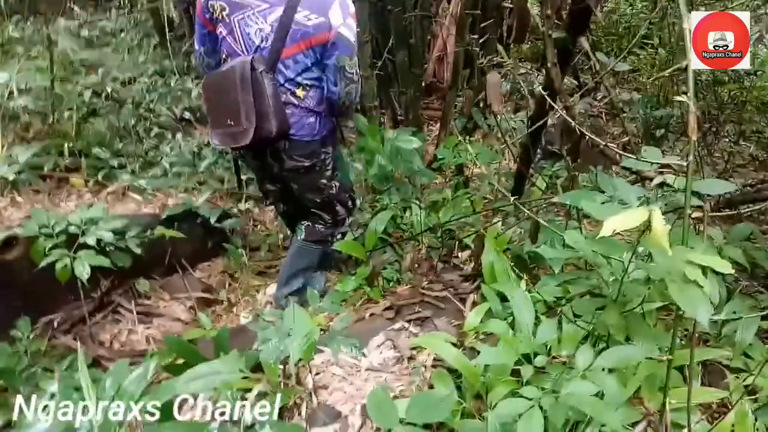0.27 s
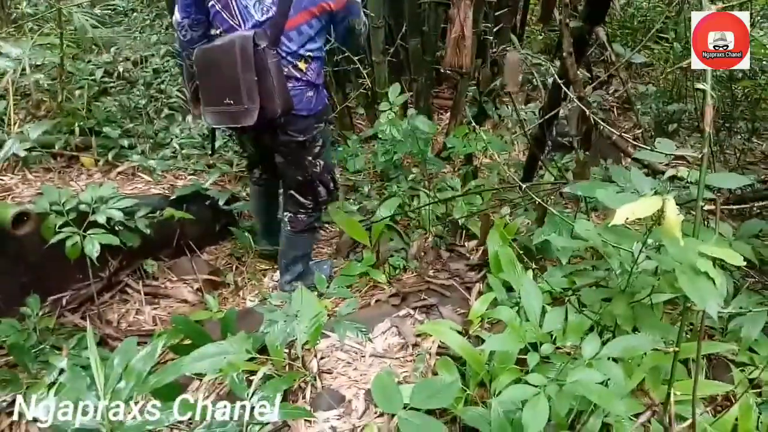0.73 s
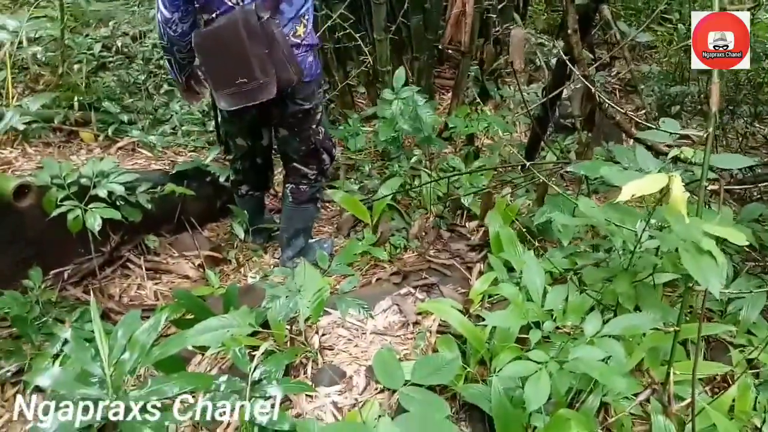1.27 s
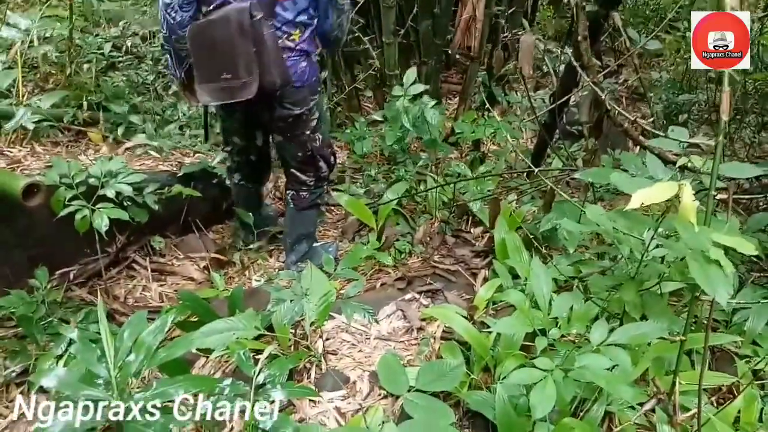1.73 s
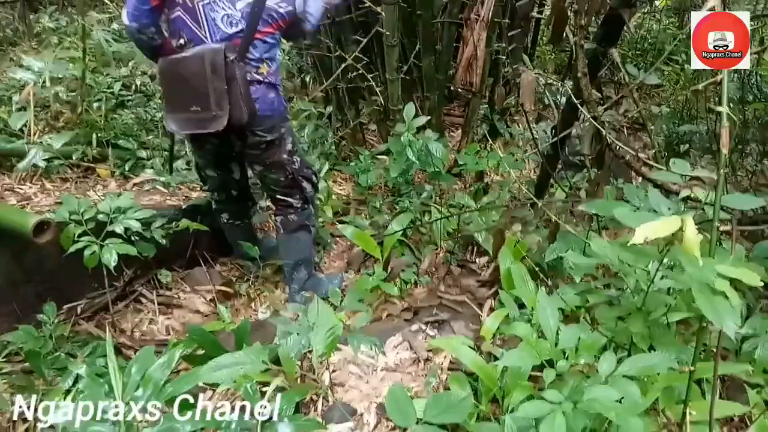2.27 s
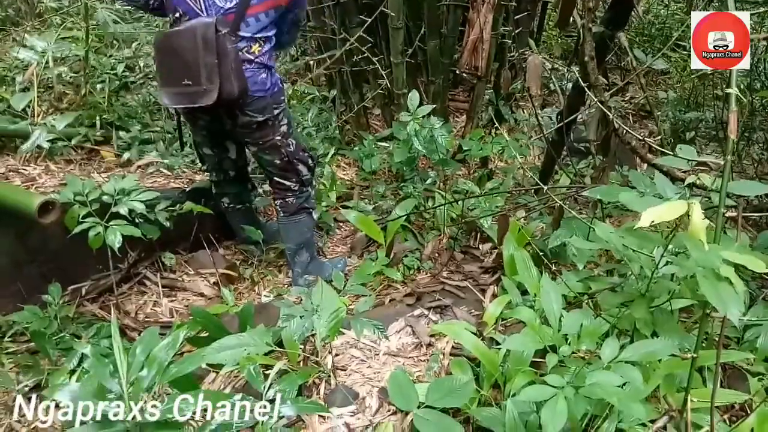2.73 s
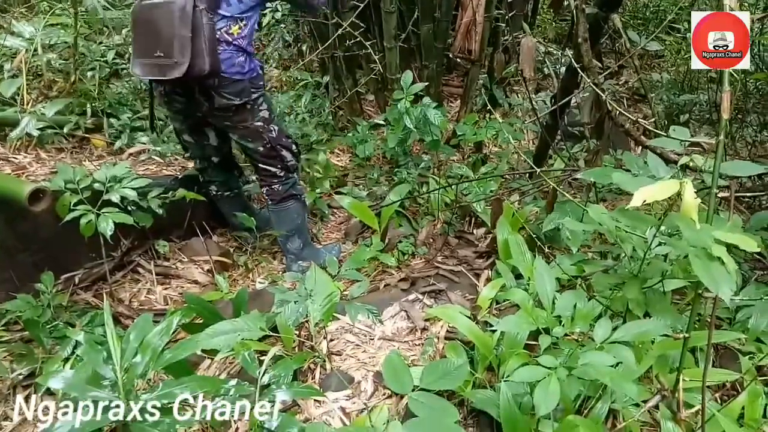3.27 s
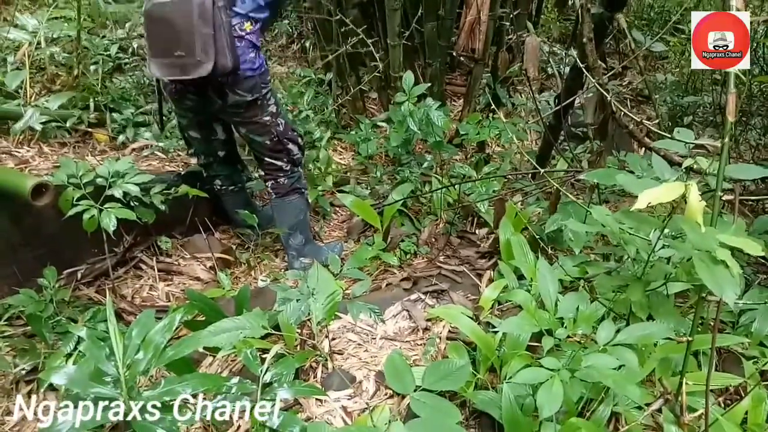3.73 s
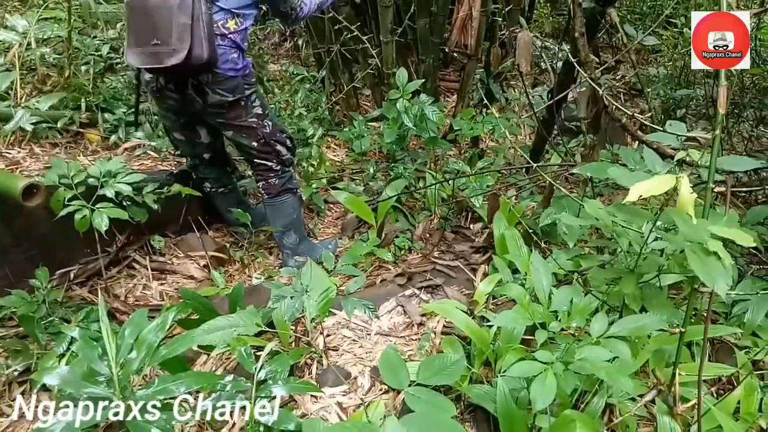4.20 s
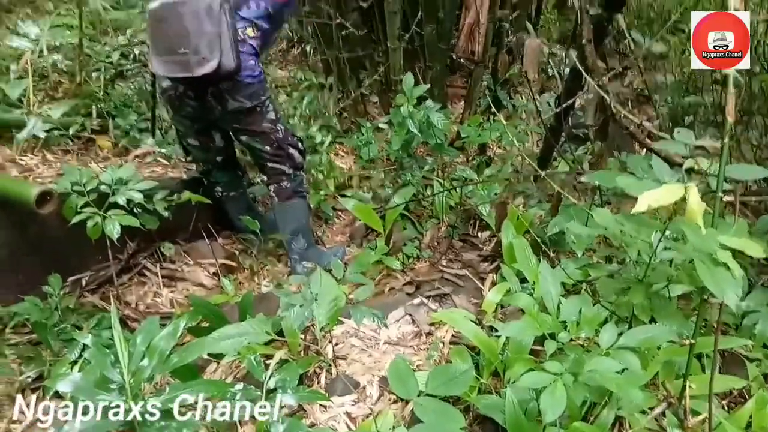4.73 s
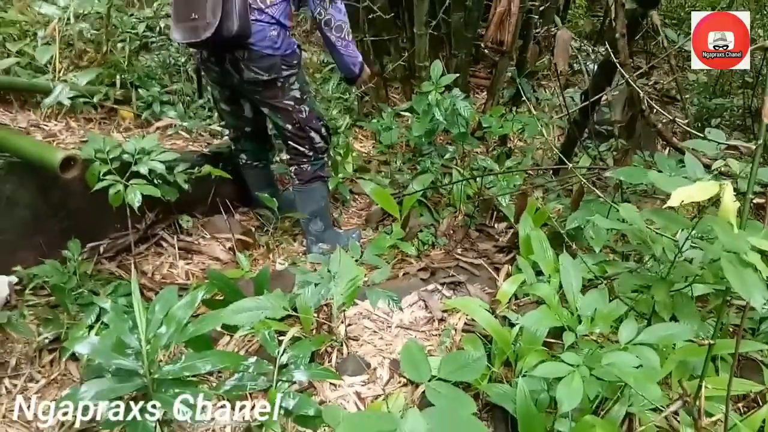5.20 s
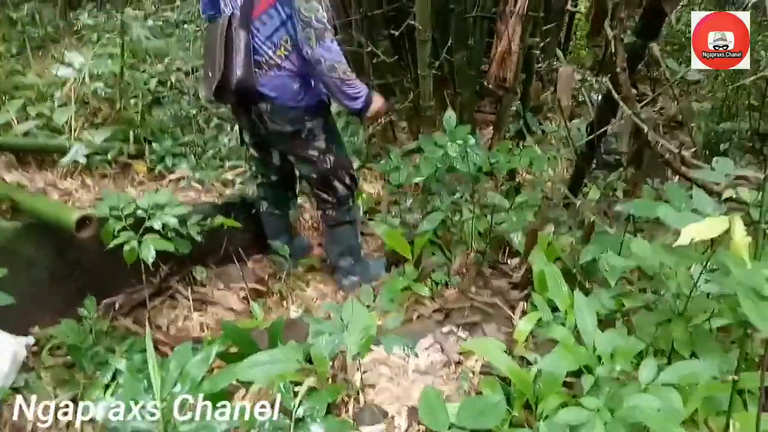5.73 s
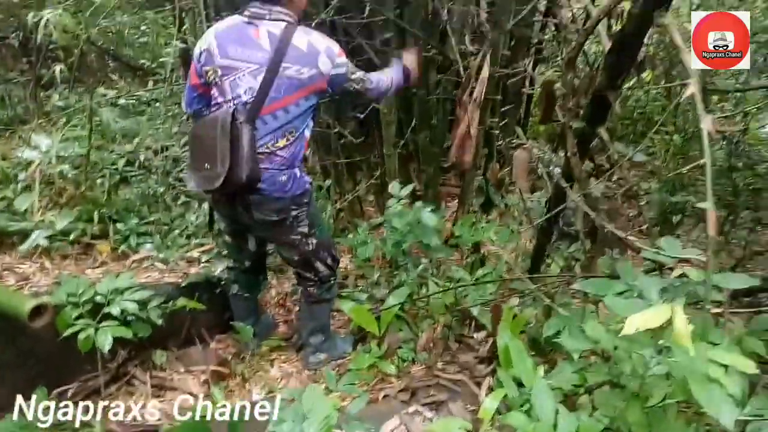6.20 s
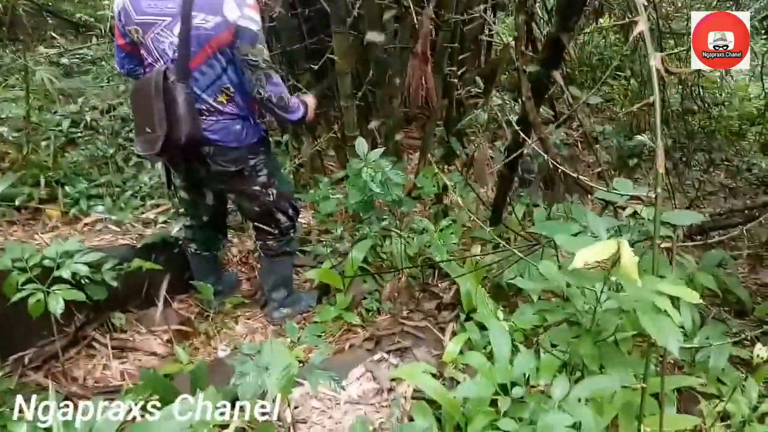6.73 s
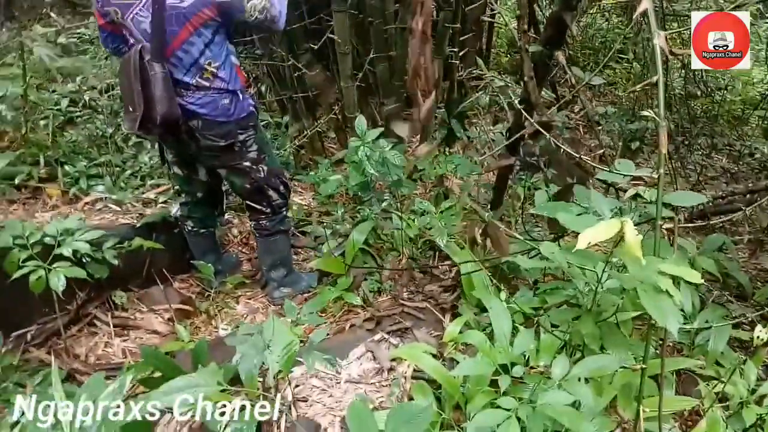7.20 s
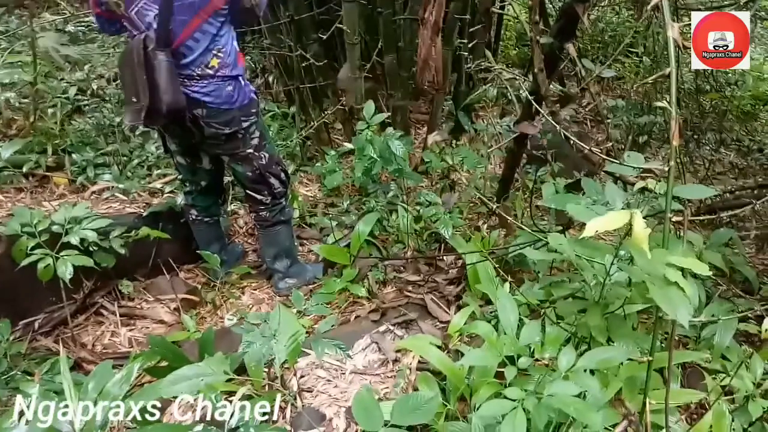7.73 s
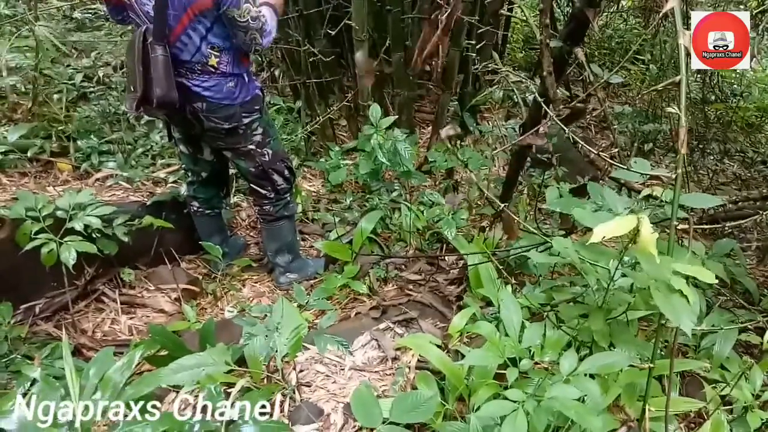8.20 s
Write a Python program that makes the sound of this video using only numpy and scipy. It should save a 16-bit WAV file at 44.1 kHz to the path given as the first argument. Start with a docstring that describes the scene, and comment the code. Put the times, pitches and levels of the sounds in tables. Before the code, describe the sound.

A few metres away in a forest, a blade swings six times through dry undergrowth, about a second or more apart. Each swing cracks and splinters stems, shakes leaves and knocks hollow bamboo, with a soft low thud. Between swings, someone brushes through plants and snaps twigs. The cracks leave a short, crackly echo. Insects drone steadily behind, and a distant bird whistles faintly just before the first cut.

```python
"""Six swings of a blade crack through dry undergrowth beside a bamboo clump, a few metres away.
Each swing tears stems, leaves splinters and shakes the leaves; stalks thud and hollow bamboo knocks.
In between, the walker, in rubber boots, brushes plants and snaps twigs.
The trunks scatter every crack into a crackly echo. Insects drone behind, and a far bird whistles."""
import sys
import numpy as np
from scipy import signal
from scipy.fft import rfft, irfft, next_fast_len
from scipy.io import wavfile
from scipy.ndimage import uniform_filter1d

SR = 44100
rng = np.random.default_rng(int(sys.argv[2]) if len(sys.argv) > 2 else 0)


def file_out(sig):
    """Save sig as 16-bit WAV at sys.argv[1]."""
    # one column per channel
    cols = np.atleast_2d(sig).T
    # limit, then scale
    lim = np.clip(cols, -1, 1)
    pcm = np.round(lim * 32767).astype(np.int16)
    wavfile.write(sys.argv[1], SR, pcm)


N = 373086
TIME = np.arange(N) / SR

# Levels in a table compare its rows; the functions set the final loudness.
# A pan is left minus right, so a positive pan_db sits to the left.
# tone of the forest background: frequency_hz, level_db
FOREST_TONE = [(25, -16), (60, -1), (115, 5), (200, -5.5), (350, -13.5), (1000, -17), (2600, -25.5),
               (3050, -17), (3450, 5), (3850, -11.5), (5000, -20), (6900, -23.5), (7700, -35), (12500, -35),
               (14000, -20), (15200, -31)]
# droning insects: pitch_hz, level_db, pan_db
INSECT_NOTES = [(3190, -69.5, -3.5), (3250, -68.5, 14.5), (3555, -63.5, 0), (3437, -66, 12),
                (3670, -77.5, 20)]
# how the insects swell and shift together: time_s, level_db, pitch_shift_hz
INSECT_SWELLS = [(0, 4, 0), (.55, -4.5, 6), (1.1, -3, 20), (2.2, -1, 0), (2.999, -0.5, 69),
                 (3.351, -0.5, 39.5), (4.25, -2.5, 2), (5.1, 0, 70), (5.901, -4, 75), (6.12, 0.5, 10.5),
                 (6.901, -1.5, -0.5), (8.46, 1, 0)]
# boots and arms brushing through plants: start_s, level_db, length_s
PLANT_BRUSHES = [(0, -64.5, .2), (0.3, -62, 0.17), (0.604, -68.5, 0.36), (3.1, -60, 0.037),
                 (4.668, -58, 0.26), (5.438, -56, 0.24), (6.688, -53.5, 0.6), (7.004, -53, 0.64),
                 (7.962, -54, 0.19), (8.201, -43.5, 0.18)]
# leaves shaken by each swing of the blade: start_s, level_db, length_s
BLADE_SWINGS = [(1.28, -54, 0.56), (2.41, -54, 0.31), (3.477, -55, 0.39), (4.446, -59.5, 0.48),
                (6.206, -44.5, 0.26), (7.62, -41, 0.18)]
# tone of dry leaves: frequency_hz, level_db
LEAF_TONE = [(100, -44), (400, -10), (1000, -11), (2200, 1), (4400, 5), (5600, -8.5), (6900, -13),
             (7900, -26.5), (15000, -18.5)]
# tone of the echo from the trunks: frequency_hz, level_db
ECHO_TONE = [(60, -7.5), (200, 8), (600, 1), (1500, -2), (4500, -2.5), (8000, 3.5), (15000, 7)]
# a distant bird: start_s, level_db, pitch_hz, length_s
BIRD_WHISTLES = [(0.685, -66, 4740, 0.054), (.75, -59, 4230, 0.062), (0.81, -60, 4730, 0.15)]
# tone of a breaking stem: frequency_hz, level_db
STEM_TONE = [(60, -30), (150, -15.5), (320, -15.5), (480, -4.5), (1000, -1), (2000, -0.5), (3300, 0.5),
             (4700, 0.5), (5600, -7), (6900, -10.5), (7900, -19), (14500, -24.5), (17000, -58.5)]
# snapping twigs: start_s, level_db, length_s, bass_db, treble_db, pan_db
TWIG_SNAPS = [(0.891, -47.5, 0.0023, -40, -4, -15), (1.729, -49, 0.015, -12, -1, 1),
              (2.125, -55.5, .021, -37, -4.5, -8), (2.753, -49, 0.011, 0, -10, -9.5),
              (2.887, -41.5, 0.031, -17, -7.5, 4), (3.16, -51.5, .02, -5, -7, -4),
              (3.21, -49.5, 0.054, -3, -3.5, 0), (3.726, -35.5, 0.0093, -27, -54, 2),
              (4.784, -42.5, .02, -28, -1.5, 5), (4.808, -46.5, 0.026, -14, -1, -1),
              (4.918, -44, 0.003, -26, -3, -2), (5.071, -45, 0.0059, -35.5, -16, -2),
              (5.305, -33.5, 0.004, -21.5, -38.5, 2.5), (5.545, -51, 0.021, -21, -3, -1),
              (5.661, -42, 0.0043, -8, -1, -1.5), (5.762, -50.5, 0.0039, -28, -21, -11),
              (6.535, -43, 0.0069, -13, -8, 6), (6.655, -38.5, 0.012, -40, -7, 1.5),
              (6.795, -39.5, 0.014, -18.5, -6.5, 4.5), (7.1515, -24.5, 0.0014, 5, -10.5, 8.5),
              (7.2534, -39, 0.0078, -2.5, -13, 3), (7.3085, -41, 0.0044, -7, -27, -10),
              (7.4215, -40.5, 0.01, -6.5, -12, -4.5), (7.5426, -40.5, .0025, 0, -4, -6),
              (7.985, -42.5, 0.034, -10, -35, 1), (8.127, -41, 0.02, -42, -1, -2),
              (8.265, -39, 0.029, -6.5, 0.5, -2)]
# stems torn by the blade: start_s, level_db, length_s, bass_db, treble_db, ring_hz
STEM_CUTS = [(1.28, -29.5, .008, -10, -11, 4220), (1.289, -21.5, 0.019, -1.5, -3, 3930),
             (1.32, -28.5, 0.012, 0, 3.5, 3300), (1.371, -27, 0.024, -7.5, -13, 1140),
             (1.41, -35, 0.013, 5, -2, 716), (1.458, -33, 0.019, 1, -5.5, 3620),
             (1.539, -29.5, 0.017, -4.5, -11.5, 1480), (2.4126, -20.5, 0.015, -6, -7.5, 4200),
             (2.519, -39, 0.016, 8, -.5, 2740), (2.55, -34, 0.0052, 10, -4, 1060),
             (2.569, -32.5, 0.018, -8.5, -2, 5070), (2.599, -30.5, 0.0089, -8, -33, 2070),
             (3.476, -19.5, 0.0084, -2.5, -5.5, 3350), (3.521, -18.5, 0.0065, -0.5, -11.5, 3100),
             (3.573, -21.5, 0.0043, -2.5, -15.5, 4800), (4.446, -21, 0.0053, -1, 4.5, 2960),
             (4.461, -18.5, 0.0039, -5, -8, 3850), (4.478, -26.5, 0.021, -31, -15, 4100),
             (4.53, -30.5, 0.0058, -4, -13, 2950), (4.553, -29.5, 0.0037, -4, -6, 2360),
             (6.2055, -24.5, 0.011, 2, -5, 1410), (6.231, -23.5, 0.0064, -3.5, -0.5, 3860),
             (6.244, -27.5, 0.036, -2, -.5, 3430), (6.278, -27, 0.031, 3.5, -24, 1360),
             (6.321, -22, 0.019, -3, 0, 3700), (6.342, -27, .013, 2.5, -21, 1430),
             (6.367, -26, 0.0075, -10, -23, 2980), (6.396, -27, 0.0035, -9, -4, 3300),
             (7.612, -28, 0.0082, -12, -6, 2450), (7.6196, -20, 0.0093, -3.5, -3.5, 3220),
             (7.6446, -18.5, .019, 0.5, -7.5, 2100), (7.7055, -18, 0.0055, 0.5, 2.5, 3440),
             (7.716, -31, 0.035, -7, -17, 740), (7.78, -32, .0085, -15, -5, 4400)]
# thick stalks jolted by a swing: start_s, level_db, pitch_hz, decay_s
STALK_THUDS = [(1.288, -44, 192, 0.11), (1.453, -41.5, 125, 0.025), (1.635, -47.5, 89, .02),
               (2.440, -35, 166, 0.023), (3.485, -46, 137, 0.059), (3.525, -38.5, 412, 0.029),
               (3.535, -48.5, 116, 0.14), (4.455, -47.5, 141, 0.077), (4.465, -36, 390, 0.044),
               (6.212, -43, 230, .07), (6.285, -44.5, 158, 0.073), (6.324, -31, 394, 0.025),
               (7.643, -44.5, 157, .11)]
# bamboo hit by the blade or by falling stems: start_s, level_db, pitch_hz, decay_s
BAMBOO_KNOCKS = [(1.311, -36, 474, 0.031), (1.377, -31.5, 1090, 0.0091), (1.63, -49, 1057, .025),
                 (1.724, -63, 968, 0.071), (2.524, -45, 1624, .015), (2.602, -24.5, 2074, 0.0057),
                 (2.882, -43.5, 2106, 0.026), (2.896, -40, 1435, 0.011), (3.476, -17, 2986, .007),
                 (3.521, -17, 1975, 0.0041), (3.576, -25.5, 1950, 0.0059), (3.215, -61.5, 1192, .02),
                 (3.740, -62, 609, 0.065), (3.791, -60, 521, 0.036), (3.881, -67, 594, 0.06),
                 (4.45, -24.5, 905, 0.0055), (4.529, -29, 2954, .0051), (4.629, -35.5, 2600, 0.0044),
                 (5.304, -46.5, 1493, 0.0053), (7.645, -29, 500, 0.023), (7.715, -36.5, 724, 0.053),
                 (7.990, -54, 938, 0.035)]
# the notes that ring together in one bamboo tube: pitch_multiple, level_db, decay_share
BAMBOO_NOTES = [(1, 1.5, 1), (1.54, -4, 0.6), (2.2, -12, .5)]
# how the microphone's two openings lean left or right: frequency_hz, pan_db
MIC_BALANCE = [(60, 6), (700, 4), (1500, 3.5), (3000, 1), (4000, -4), (5000, -8.5), (6200, -3.5), (8000, 2),
               (12000, 0), (15000, 2)]
# how much of the left-right difference the openings keep: frequency_hz, gain_db
MIC_WIDTH = [(60, -10), (400, -5), (900, -4), (1600, -0.5), (2600, 0.5), (4000, 0), (8000, 0), (15000, 0.5)]

PAN_SCATTER_DB = 1.6  # how much the pan varies from crack to crack


def gain(db):
    """Turn decibels into a number to multiply a sound by."""
    return 10 ** (np.asarray(db) / 20)


def normalise(x):
    """Scale a sound to an average (rms) strength of 1."""
    return x / np.sqrt(np.mean(x ** 2))


def pan(pan_db):
    """Left and right gains that place a sound to one side."""
    return gain(np.array([[pan_db], [-pan_db]]) / 2)


def curve_db(table, hz):
    """Read a table's decibels at any frequency."""
    table_hz, db = np.transpose(table)
    return np.interp(np.log(hz + 1), np.log(table_hz), db)


def colour(x, db_at):
    """Turn each frequency up or down by db_at(hz), keeping sudden starts sharp."""
    size = 2 * next_fast_len(x.shape[-1] // 2 + 2048, real=True)
    cepstrum = irfft(np.log(gain(db_at(np.fft.rfftfreq(size, 1 / SR)))))
    # make the filter ring only after a click, never before it
    cepstrum[1:size // 2] *= 2
    cepstrum[size // 2 + 1:] = 0
    return irfft(rfft(x, size) * np.exp(rfft(cepstrum)))[..., :x.shape[-1]]


def with_tone(x, table):
    """Filter a sound with a tone table."""
    return colour(x, lambda hz: curve_db(table, hz))


def bump(hz, centre_hz, octaves):
    """A bell-shaped curve around one pitch."""
    return np.exp(-.5 * (np.log2((hz + 1) / centre_hz) / octaves) ** 2)


def band(x, centre_hz, octaves):
    """Keep only the frequencies around one pitch."""
    size = next_fast_len(x.shape[-1], real=True)
    bell = bump(np.fft.rfftfreq(size, 1 / SR), centre_hz, octaves)
    return irfft(rfft(x, size) * bell, size)[..., :x.shape[-1]]


def wander(rate_hz):
    """Glide to a new random value, mostly within -1 to 1, rate_hz times a second."""
    values = rng.standard_normal(size=2048)
    steps = values[(TIME * rate_hz).astype(int) % len(values)]
    return uniform_filter1d(steps, int(SR / rate_hz))


def crackle(spread_db, size, grain_samples):
    """Stereo noise in tiny grains: most are soft, a few are loud."""
    grains = gain(spread_db * np.minimum(rng.exponential(size=size // grain_samples + 1), 4))
    return normalise(np.repeat(grains, grain_samples)[:size] * rng.standard_normal((2, size)))


def forest(level_db=-63, swell_db=1):
    """Distant air rumbles under a far insect chorus and a faint, very high shrill."""
    noise = normalise(with_tone(rng.standard_normal((2, N)), FOREST_TONE))
    return noise * gain(level_db + swell_db * wander(18))


def insect_drone(drift=.003, flutter_db=3, blur_radians=0.84):
    """Each insect holds a wavering note, blurred by its many paths through the leaves."""
    time_s, swell_db, shift_hz = np.transpose(INSECT_SWELLS)
    shared_shift_hz = np.interp(TIME, time_s, shift_hz)
    out = 0
    for hz, db, pan_db in INSECT_NOTES:
        pitch_hz = hz * (1 + drift * wander(1.9)) + shared_shift_hz
        phase = 2 * np.pi * np.cumsum(pitch_hz) / SR
        note = np.array([np.cos(phase + 2 * wander(2.9) + blur_radians * wander(60)) for _ in range(2)])
        out += gain(db) * pan(pan_db) * normalise(note * gain(flutter_db * wander(4.8)))
    return out * gain(np.interp(TIME, time_s, swell_db))


def insect_hiss(level_db=-70, fade_db_per_s=0.9, swell_at_s=0.89, swell_s=0.37):
    """A thin, flickering insect hiss on the right swells once, then slowly fades."""
    noise = normalise(band(rng.standard_normal((2, N)), centre_hz=4300, octaves=0.27))
    swell_db = 9 * np.exp(-((TIME - swell_at_s) / swell_s) ** 2)
    flicker_db = 3.5 * wander(11) + 1.9 * wander(2.3)
    return noise * pan(-7) * gain(level_db - fade_db_per_s * TIME + swell_db + flicker_db)


def leaf_motion_db(time_s, rise_s=0.11, settle_db_per_s=81.5, still_db=-76):
    """How loud the leaves are: each swing or brush stirs them, keeps them moving, then lets them rest."""
    power = gain(still_db) ** 2
    for start_s, db, length_s in BLADE_SWINGS + PLANT_BRUSHES:
        rise = np.clip((time_s - start_s) / rise_s, 0, 1)
        settling_s = np.maximum(time_s - start_s - length_s, 0)
        power = power + (rise * gain(db - settle_db_per_s * settling_s)) ** 2
    return 10 * np.log10(power)


def leaf_rustle(offset_db=-2, patchy_db=4, flicker_db=3):
    """Dry leaves rub in patches of tiny clicks; large and small ones flicker at their own pitches."""
    clicks = crackle(3, N, grain_samples=30)
    rustle = 0
    for centre_hz in 550 * 2. ** np.arange(5):
        rustle += band(clicks, centre_hz, octaves=0.56) * gain(flicker_db * wander(25))
    level_db = offset_db + leaf_motion_db(TIME) + patchy_db * wander(35)
    return normalise(with_tone(rustle, LEAF_TONE)) * gain(level_db)


def stick_ticks(lowest_hz=1300, octaves=1.7, spread_db=3, count=330, size=1024):
    """Small sticks and chips tick against each other, louder while the leaves move."""
    out, t = np.zeros((2, N)), np.arange(size) / SR
    for when, pitch, strength, left_phase, right_phase in rng.random((count, 5)):
        start_s = when * N / SR
        hz = lowest_hz * 2 ** (octaves * pitch)
        db = leaf_motion_db(start_s) + spread_db * min(-np.log(1 - strength), np.pi)
        cycles = hz * t
        fade = (1 - np.exp(-cycles)) * np.exp(-cycles / 3.5)
        note = np.sin(2 * np.pi * (cycles + np.array([[left_phase], [right_phase]])))
        add(out, start_s, gain(db) * fade * note)
    return out


def add(out, start_s, sound):
    """Mix a sound in at its start time."""
    i = max(int(start_s * SR), 0)
    out[:, i:i + sound.shape[1]] += sound[:, :N - i]


def trunk_echo(x, near_db=-5, near_s=0.05, far_db=-14, far_s=0.12, rise_s=.004, size=49152):
    """Near trunks throw back a quick, grainy echo; the deep forest answers longer, smoother, duller."""
    t = np.arange(size) / SR
    rise = 1 - np.exp(-t / rise_s)
    near = normalise(rise * np.exp(-t / near_s) * crackle(2.8, size, grain_samples=20))
    far = normalise(rise * np.exp(-t / far_s) * crackle(1.5, size, grain_samples=60))
    far = colour(far, lambda hz: -5 * hz / 7000)  # 5 dB duller for every 7000 Hz
    echo = with_tone(gain(near_db) * near + gain(far_db) * far, ECHO_TONE) / np.sqrt(size)
    return signal.fftconvolve(x, echo, axes=1)[:, :N]


def bird(waver=0.0092, pan_db=-3):
    """A far bird gives three thin whistles, each on a nearly steady pitch."""
    out = np.zeros((2, N))
    wobble = 1 + waver * wander(90.7)
    for start_s, db, hz, length_s in BIRD_WHISTLES:
        swell = np.sin(np.pi * np.clip((TIME - start_s) / length_s, 0, 1))
        whistle = np.sin(2 * np.pi * hz * np.cumsum(wobble) / SR)
        out += gain(db) * pan(pan_db) * swell * whistle
    return out


def breaking_wood(rows, grain_db, bite, sag, release_s, ring_db, ring_octaves, shake_db, shake_s):
    """Fibres break one after another along each stem, which rings briefly while its leaves shiver."""
    size = 8192
    out, t = np.zeros((2, N)), np.arange(size) / SR
    for start_s, db, length_s, bass_db, treble_db, ring_hz, pan_db in rows:
        tear = np.exp(-sag * np.minimum(t / length_s, 1) - np.maximum(t - length_s, 0) / release_s)
        first_crack = 1 + bite * np.exp(-t / 0.00057)  # the first fibres give way hardest
        fibres = tear * first_crack * crackle(grain_db, size, grain_samples=9)
        fibres *= np.sqrt(2 * length_s * SR / np.sum(fibres ** 2))
        pull = gain(shake_db) * np.sqrt(length_s / shake_s)  # a longer tear pulls the leaves harder
        shiver = pull * np.exp(-t / shake_s) * crackle(1.2, size, grain_samples=24)
        ripple_db = 2 * rng.standard_normal(size=128)  # every stem has its own uneven tone

        def stem_db(hz):
            """Thick stems have more bass, brittle ones more treble; each has its own hollow ring."""
            bass = bass_db / (1 + (hz / 1400) ** 4)
            treble = treble_db / (1 + (5600 / (hz + 1)) ** 8)
            ripple = np.interp(hz, np.linspace(0, SR / 2, len(ripple_db)), ripple_db)
            ring = ring_db * bump(hz, ring_hz, ring_octaves)
            return curve_db(STEM_TONE, hz) + bass + treble + ripple + ring

        add(out, start_s, gain(db) * pan(pan_db) * colour(fibres + shiver, stem_db))
    return out


def snapping_twigs(ring_hz=3090, scatter_octaves=0.34):
    """Thin twigs snap sharply and ring high, each at a slightly different pitch."""
    rows = [(*twig, ring_hz * 2 ** (scatter_octaves * rng.standard_normal()), pan_db)
            for *twig, pan_db in TWIG_SNAPS]
    return breaking_wood(rows, grain_db=2.5, bite=1, sag=.5, release_s=0.0017,
                         ring_db=4, ring_octaves=.1, shake_db=-12, shake_s=0.0093)


def tearing_stems(pan_db=1.8):
    """The blade tears through stems a little to the left, and splinters give way after it."""
    rows = [(*cut, pan_db + PAN_SCATTER_DB * rng.standard_normal()) for cut in STEM_CUTS]
    return breaking_wood(rows + splinter_rows(), grain_db=2, bite=0.45, sag=0.28, release_s=0.0054,
                         ring_db=5.5, ring_octaves=0.13, shake_db=-6.5, shake_s=0.037)


def stalk_thuds(rise_s=0.014, size=16384):
    """A jolted stalk moves the air in a short, low flutter."""
    out, t = np.zeros((2, N)), np.arange(size) / SR
    for start_s, db, hz, decay_s in STALK_THUDS:
        flutter = band(rng.standard_normal(size), hz, octaves=0.54)
        swell = (1 - np.exp(-t / rise_s)) * np.exp(-t / decay_s)
        strength = gain(db) * np.sqrt(np.mean(swell ** 2))
        add(out, start_s, strength * normalise(flutter * swell)[None])
    return out


def bamboo_knocks(contact_s=0.0011, tremble_radians=0.94, size=24576):
    """A brief scrape sets a hollow tube ringing; it trembles against its neighbours as it fades."""
    out, t = np.zeros((2, N)), np.arange(size) / SR
    rise = 1 - np.exp(-t / contact_s)
    for start_s, db, pitch_hz, decay_s in BAMBOO_KNOCKS:
        ring = 0
        for multiple, note_db, decay_share in BAMBOO_NOTES:
            hz = pitch_hz * multiple
            tremble = normalise(uniform_filter1d(rng.standard_normal((2, size)), size=300))
            # the higher the note, the further left and right fall out of step
            phase = rng.uniform(0, 2 * np.pi) + rng.standard_normal((2, 1)) * hz / 4000
            note = np.sin(2 * np.pi * hz * t + phase + tremble_radians * tremble)
            ring += gain(note_db) * np.exp(-t / (decay_s * decay_share)) * note
        add(out, start_s, gain(db) * rise * ring)
    return out


def splinter_rows(count=4, wait_s=.12, within_s=.22, over_leaves_db=18.5, fade_db_per_s=57.5,
                  length_s=0.003, bass_db=-2.5, treble_db=-11.5, middle_hz=2020):
    """List the small cracks that follow each swing at uneven gaps: the later, the weaker."""
    rows = []
    for swing_s, leaves_db, _ in BLADE_SWINGS:
        for k, (when, pitch, side) in enumerate(rng.random((count, 3))):
            late_s = within_s * (k + when) / count
            db = leaves_db + over_leaves_db - fade_db_per_s * late_s
            ring_hz = middle_hz * 2 ** (2 * pitch - 1)
            pan_db = PAN_SCATTER_DB * (2 * side - 1)
            rows.append((swing_s + wait_s + late_s, db, length_s, bass_db, treble_db, ring_hz, pan_db))
    return rows


def scene():
    """Stems, twigs, bamboo and leaves echo among the trunks, over thuds, insects and a bird."""
    stems = gain(6.5) * tearing_stems()
    twigs = gain(4.5) * snapping_twigs()
    bamboo = gain(4) * bamboo_knocks()
    leaves = leaf_rustle() + stick_ticks()
    echo = trunk_echo(gain(-4) * leaves + stems + gain(-3) * twigs + gain(-12) * bamboo)
    clearing = stems + twigs + bamboo + leaves + echo + stalk_thuds()
    return clearing + insect_drone() + insect_hiss() + bird() + forest()


def record(dry, ceiling=0.98, top_hz=15700):
    """Two close microphone openings hear much the same bass but different treble, each in its own tone."""
    size = next_fast_len(N, real=True)
    hz = np.fft.rfftfreq(size, 1 / SR)
    left, right = rfft(dry, size)
    # what the openings do not hear apart, they hear together
    width = gain(curve_db(MIC_WIDTH, hz))
    shared = (left + right) / 2 * np.sqrt(np.maximum(2 - width ** 2, .5))
    apart = (left - right) / 2 * width
    balance = gain(np.array([[1], [-1]]) * curve_db(MIC_BALANCE, hz) / 2)
    heard = irfft(np.array([shared + apart, shared - apart]) * balance, size)[:, :N]
    rounded_peaks = ceiling * np.tanh(heard / ceiling)
    treble_cut = signal.ellip(8, .2, 70, top_hz, fs=SR, output="sos")
    return signal.sosfilt(treble_cut, rounded_peaks)


dry = scene()
out = record(dry)
file_out(out)
```